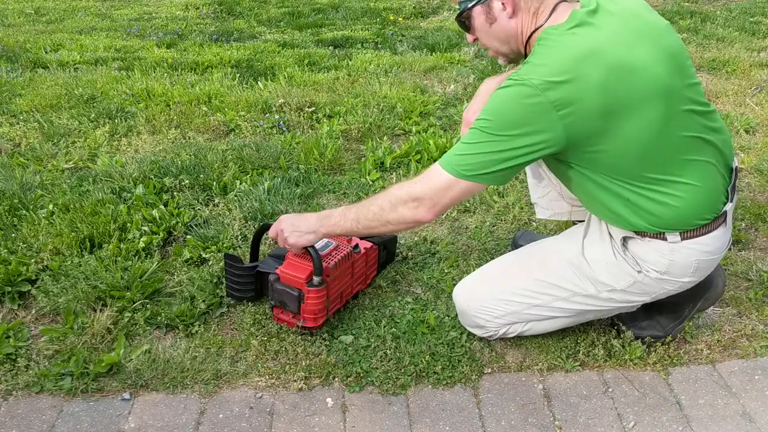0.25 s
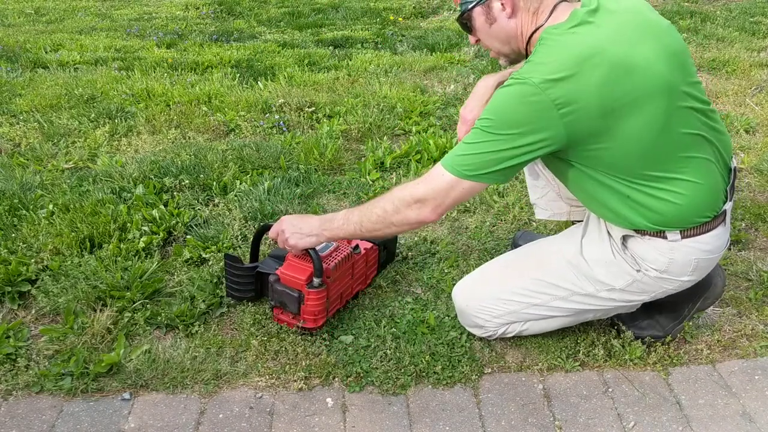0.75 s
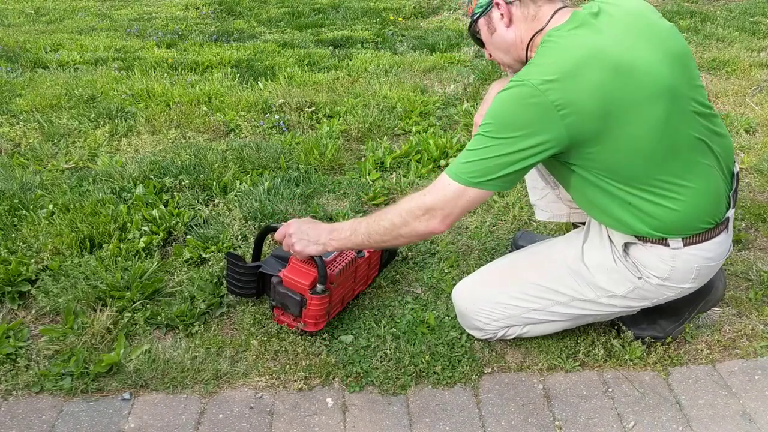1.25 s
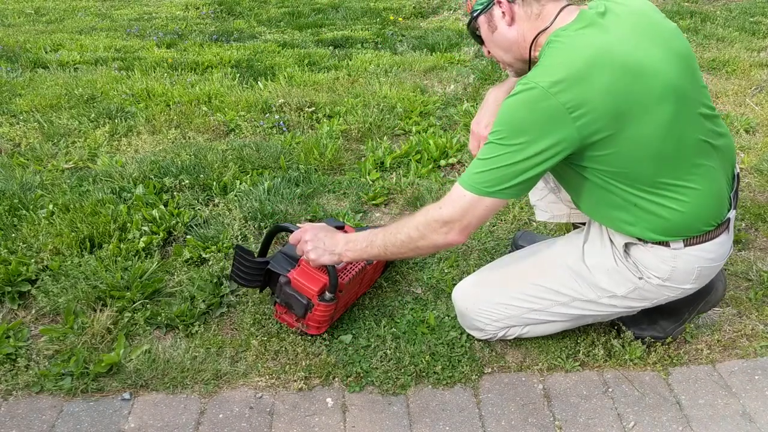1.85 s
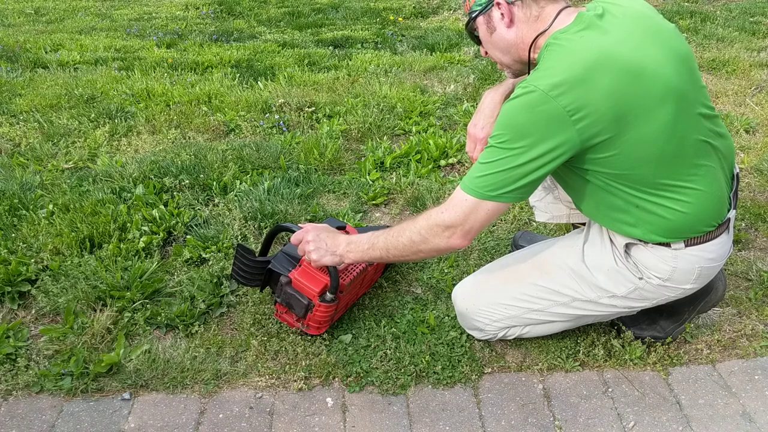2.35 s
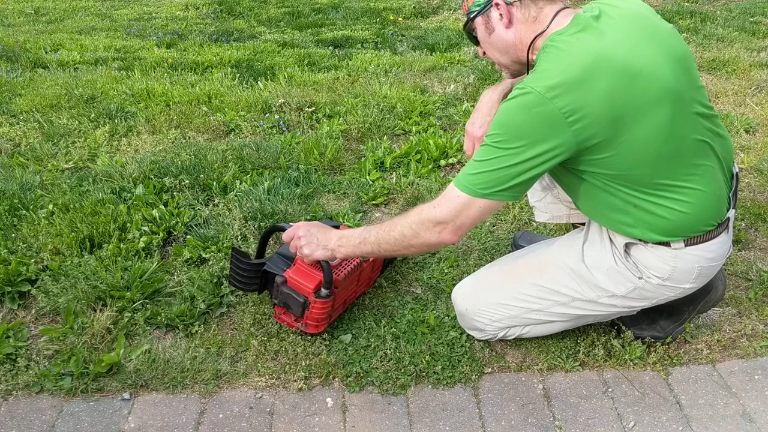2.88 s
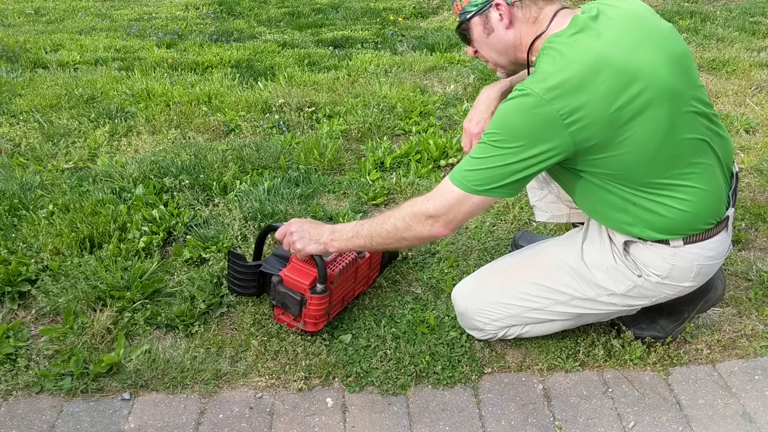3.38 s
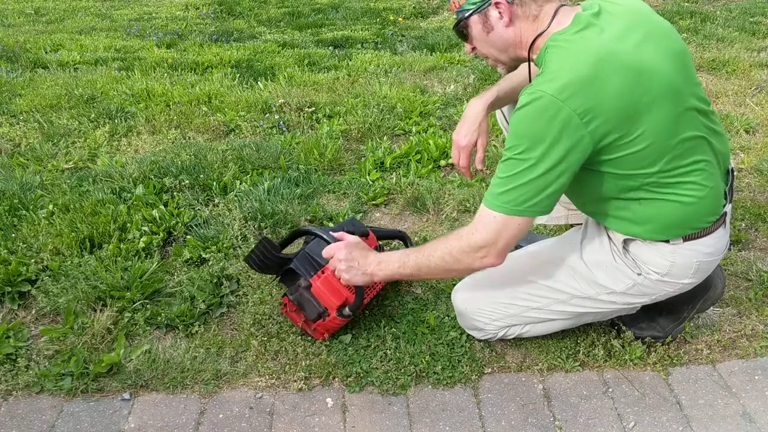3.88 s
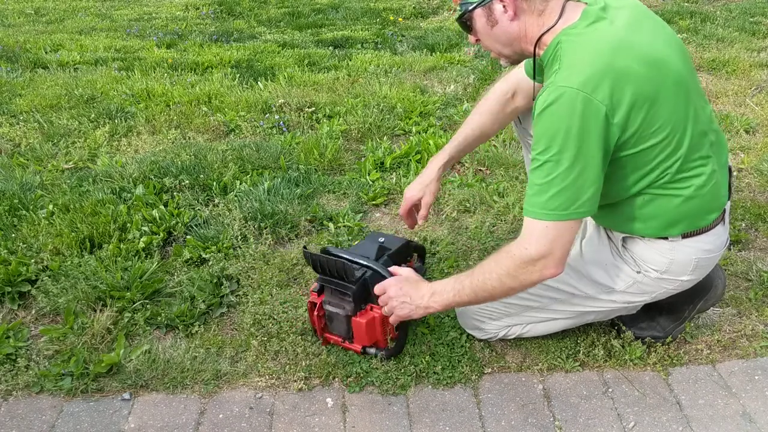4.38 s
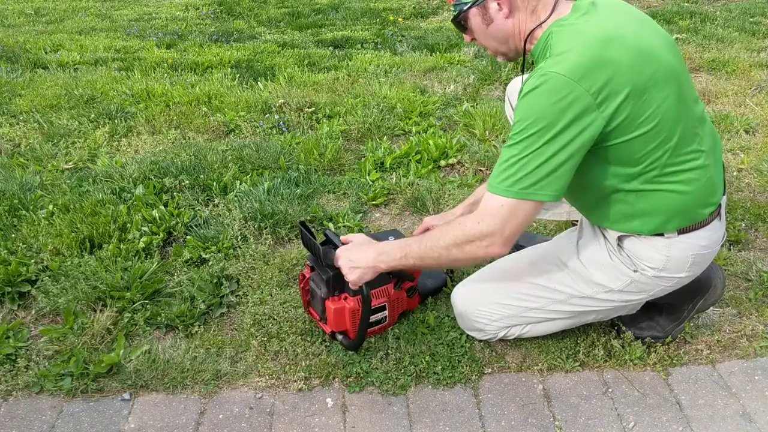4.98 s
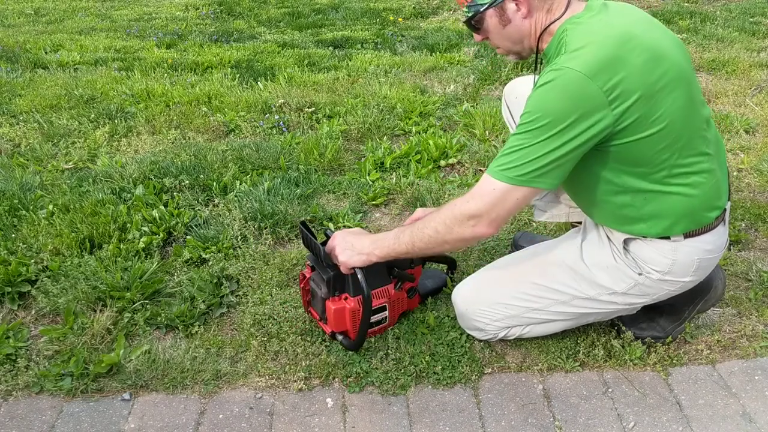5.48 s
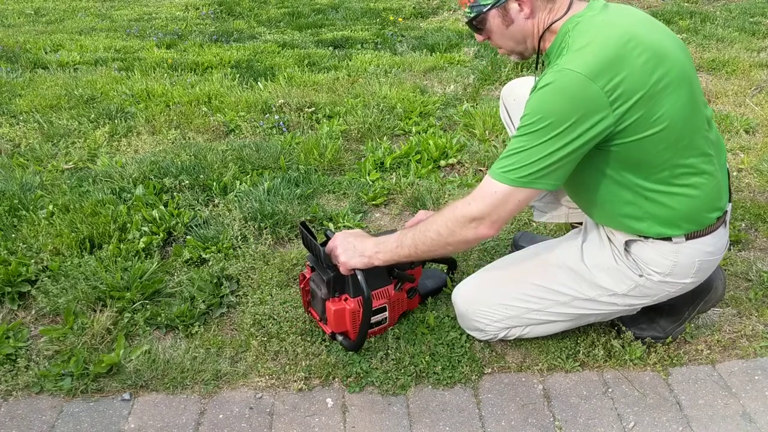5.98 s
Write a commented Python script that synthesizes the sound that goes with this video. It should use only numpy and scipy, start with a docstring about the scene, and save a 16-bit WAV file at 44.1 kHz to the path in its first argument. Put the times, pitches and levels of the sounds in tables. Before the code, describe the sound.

The first half is quiet open air: far traffic hum, a weak low motor tone, a thin insect whine, a songbird's repeated quick upslurs and short nasal crow caws, with scattered outdoor echoes. Near four seconds, grass brushes against a stopped saw being handled, followed by small hard plastic rattles. From about four and a half seconds, loud low wind buffeting bursts against the microphone until the end; the saw's engine never runs.

```python
"""A distant crow caws and small birds whistle over the hum of far traffic, a motor's drone and a thin insect whine.
Small birds then trill, lisp and chip: every bird note is a gliding tone, most with scattered echoes.
A man turns a stopped chainsaw over in the grass: grains of noise rustle, and short noise bursts click.
Then gusts of wind buffet the microphone: loud, low noise whose strength and colour follow the gusts."""
import sys
import numpy as np
from scipy import signal
from scipy.fft import rfft, irfft
from scipy.io import wavfile
from scipy.ndimage import uniform_filter1d

SR = 44100
rng = np.random.default_rng(int(sys.argv[2]) if len(sys.argv) > 2 else 0)


def put_to_file(sound):
    """Save the sound as 16-bit audio at rate SR, in the file named by the first command-line argument."""
    columns = np.atleast_2d(sound).T  # one column per channel
    safe = np.clip(columns, -1, 1)
    whole_steps = np.round(safe * 32767)
    wavfile.write(sys.argv[1], SR, whole_steps.astype(np.int16))


N = 275184
TIME = np.arange(N) / SR


def amp(db):
    """Turns decibels into a gain."""
    return 10 ** (np.asarray(db) / 20)


def unit(x):
    """Scales a sound to an average (rms) strength of 1."""
    return x / np.sqrt(np.mean(x ** 2) + 1e-20)


def noise():
    """Plain white noise, as long as the scene."""
    return rng.standard_normal(N)


def tone(hz):
    """A pure tone of rms 1 that follows a changing pitch."""
    phase = 2 * np.pi * np.cumsum(hz) / SR
    return np.sqrt(2) * np.sin(phase)


def curve(rows):
    """Joins the (time, level) points of a table by straight lines, giving a level at every sample."""
    times, levels = np.transpose(rows)
    return np.interp(TIME, times, levels)


def swells(rows):
    """Gain of bell-shaped swells that add in power; at the half-width the power is down to 1/e."""
    power = sum(amp(db) ** 2 * np.exp(-((TIME - peak_s) / half_s) ** 2) for peak_s, db, half_s in rows)
    return np.sqrt(power + 1e-14)


def colour(x, points):
    """Filters by a spectrum table that falls away steeply past its ends; rms 1."""
    hz, db = np.transpose(points)
    octave = np.log2(np.fft.rfftfreq(N, 1 / SR) + 1)
    known = np.log2(hz + 1)
    octaves_outside = abs(octave - np.clip(octave, known[0], known[-1]))
    gain = amp(np.interp(octave, known, db) - 9.6 * octaves_outside)
    return unit(irfft(rfft(x) * gain, N))


def drift(rate_hz, size=N):
    """Smooth random wander: noise kept below about rate_hz, scaled to rms 1 before it is cut to size."""
    f = np.fft.rfftfreq(N, 1 / SR)
    slow = irfft(rfft(noise()) / (1 + (f / rate_hz) ** 4), N)
    return unit(slow)[:size]


def add(mix, start_s, sound):
    """Mixes a sound in at a time, cutting off what runs past the end."""
    part = mix[max(round(start_s * SR), 0):][:len(sound)]
    part += sound[:len(part)]


def garden(x, t60):
    """Scatter from trees and house walls: sparse echoes that fade by 60 dB in t60 seconds, same energy."""
    t = TIME[:SR]
    echoes = rng.standard_normal(SR) * (rng.random(SR) < .1)
    build_up = 1 - np.exp(-t / 0.0055)
    tail = echoes * amp(-60 * t / t60) * build_up
    return signal.fftconvolve(x, tail / np.linalg.norm(tail))[:N]


def distant(x, wet_db, t60):
    """A sound together with its scatter."""
    return x + amp(wet_db) * garden(x, t60)


# Sound colour of far traffic and open air: (frequency [Hz], relative level [dB per Hz])
AIR_COLOUR = [(35, -21), (60, -1), (129, -5), (156, -4.5), (259, -9.5), (291, -11.5), (403, -12.5),
              (443, -15.5), (910, -11.5), (2100, -22), (3190, -27), (5450, -32), (7540, -34.5),
              (8670, -39.5), (15500, -39)]
# Tyre noise on a far road draws near and stays: (time [s], level [dB])
ROAD_LEVEL = [(0, -67.5), (1.9, -63.5), (2.5, -57), (6.24, -55.5)]


def background(air_db=-53, swell_db=0.78, throb_db=2.0):
    """Steady town hum and hiss with throbbing bass, plus tyre noise that draws near and stays."""
    air = amp(air_db) * colour(noise(), AIR_COLOUR)
    bass = signal.sosfilt(signal.butter(2, 300, fs=SR, output="sos"), air)
    throb = amp(throb_db * drift(4.6)) - 1
    # tyre colour: (frequency [Hz], relative level [dB per Hz])
    tyres = colour(noise(), [(200, 1.5), (350, -1), (600, -2.5), (950, -4.0), (1400, -6), (2200, -18)])
    road = amp(curve(ROAD_LEVEL) + swell_db * drift(4.7))
    return air + bass * throb + road * tyres


# Strength of the far motor, before its random fading: (time [s], level [dB])
DRONE_LEVEL = [(0, -60.5), (2.1, -59.5), (2.6, -67.5), (6.24, -64)]


def drone(hz=124, waver=0.026, fade_db=2):
    """A far motor: only its firing tone carries, wavering on the moving air."""
    firing = tone(hz * (1 + waver * drift(12.7)))
    return amp(curve(DRONE_LEVEL) + fade_db * drift(4.7)) * firing


# Spells of an insect's thin whine, before its flicker: (time of the peak [s], level [dB], half-width [s])
WHINE_SPELLS = [(.42, -76, 0.18), (1.25, -79, .22), (2.75, -79.5, .15), (4.9, -80.5, 0.95),
                (6.0, -78, 0.083)]


def insect(hz=7335, waver=0.0064, flicker_db=3):
    """A faint, narrow whine: one high, wavering tone that comes and goes."""
    whine = tone(hz * (1 + waver * drift(90)))
    return swells(WHINE_SPELLS) * amp(flicker_db * drift(25)) * whine


def notes(rows, waver, waver_hz, bow=0.98):
    """Bird notes: one gliding tone each, with a quick waver in pitch; a bow above 1 delays the glide."""
    out, shake = np.zeros(N), drift(waver_hz)
    for start_s, length_s, db, from_hz, to_hz in rows:
        share = np.arange(0, length_s, 1 / SR) / length_s
        glide = from_hz + (to_hz - from_hz) * share ** bow
        note_shake = shake[max(round(start_s * SR), 0):][:len(share)]
        note = tone(glide * (1 + waver * note_shake))
        add(out, start_s, amp(db) * note * signal.windows.tukey(len(share), .5))
    return out


# Clear whistles: (start [s], length [s], level [dB], from [Hz], to [Hz])
WHISTLE_NOTES = [(.26, .05, -73, 2700, 3150), (.305, 0.038, -66.5, 3100, 3850), (0, .08, -77, 4370, 4300),
                 (.19, .12, -78, 4370, 4370), (.5, .08, -77, 4370, 4370), (5.66, 0.09, -69.5, 2660, 3360),
                 (5.862, 0.1, -63.5, 4100, 4030)]


def whistles():
    """Clear whistled tones, some rising and some almost steady, with only a little scatter."""
    return distant(notes(WHISTLE_NOTES, waver=0.003, waver_hz=120), wet_db=-11, t60=.4)


# Thin, buzzy lisps: (start [s], length [s], level [dB], from [Hz], to [Hz])
LISP_NOTES = [(1.74, 0.075, -74.5, 7560, 7600), (2.72, 0.073, -77, 7400, 7350),
              (3.728, 0.037, -66.5, 8000, 7300), (3.745, .125, -71, 7240, 7120),
              (3.75, 0.112, -75, 7800, 7900), (5.783, 0.041, -68, 8160, 7480),
              (5.815, 0.065, -72, 7750, 7800)]


def lisps():
    """Thin, high lisps: a quick, random waver in pitch makes them buzz."""
    return distant(notes(LISP_NOTES, waver=0.015, waver_hz=350), wet_db=-0.5, t60=0.56)


def trill(count=14, low_hz=2850, high_hz=4000, slur_s=0.028, uneven_db=1.0):
    """A songbird's run of upslurs, slowing a little and, but for chance, loudest in the middle."""
    start_s, step_s, slowing_s = .74, .1265, .00015
    middle_db, ends_db = -65.5, -2.5  # ends_db is relative to the middle
    slurs = []
    for k in range(count):
        slur_start_s = start_s + step_s * k + slowing_s * k ** 2
        length_s = slur_s * rng.uniform(0.75, 1.2)
        from_middle = 2 * k / (count - 1) - 1
        db = middle_db + ends_db * from_middle ** 2 + uneven_db * rng.standard_normal()
        slurs.append((slur_start_s, length_s, db, low_hz, high_hz))
    return distant(notes(slurs, waver=0.016, waver_hz=200, bow=1.8), wet_db=-3.5, t60=0.56)


# Sharp rising chips, direct sound: (start [s], length [s], level [dB], from [Hz], to [Hz])
CHIP_NOTES = [(0.898, 0.0073, -64, 5980, 8500), (2.174, 0.008, -62, 5880, 8140),
              (2.826, 0.008, -61, 5200, 8250), (4.705, 0.0081, -48, 5600, 8370),
              (4.714, 0.0086, -56, 6570, 7700), (4.725, 0.0062, -57, 6400, 8200)]


def chips(scatter_db=-59):
    """Very short, fast-rising chips; the garden throws back about as much of a far one as of a near one."""
    direct = notes(CHIP_NOTES, waver=.004, waver_hz=500)
    thrown = [(start_s, length_s, scatter_db, from_hz, to_hz)
              for start_s, length_s, _, from_hz, to_hz in CHIP_NOTES]
    return direct + garden(notes(thrown, waver=0.0091, waver_hz=500), t60=0.6)


# Caws: (start [s], length [s], level before shaping [dB], top pitch before flutter [Hz])
CAW_CALLS = [(0.039, 0.099, -55, 718), (2.236, 0.093, -54.5, 711), (2.761, .1, -49.5, 713),
             (3.716, 0.12, -48, 729), (4.36, 0.11, -47.5, 725), (4.891, .103, -47, 711.4),
             (5.837, 0.084, -48, 699)]
# Course of one caw: (share of its length [0 to 1], pitch factor [ratio], relative level [dB])
CAW_COURSE = [(0, .86, -8), (.15, .945, -1.5), (.32, 1., 0), (.55, .96, -.5), (.8, .9, -3.5), (1, .845, -8)]
# Relative strength of partials 1 to 4 of the voice: one level each [dB]
CAW_PARTIAL_LEVELS = [-19, -1, -17.5, -31]


def crow(rasp=0.27, rasp_hz=62):
    """Arched nasal caws, fluttering in pitch and strength; the throat favours the second partial."""
    out = np.zeros(N)
    course_share, course_pitch, course_db = np.transpose(CAW_COURSE)
    for start_s, length_s, db, top_hz in CAW_CALLS:
        t = np.arange(0, length_s, 1 / SR)
        share = t / length_s
        flutter = np.sin(2 * np.pi * (rasp_hz * t + rng.random()))
        shake = 1 + .017 * flutter + .02 * drift(200, size=len(t))
        hz = top_hz * np.interp(share, course_share, course_pitch) * shake
        phase = 2 * np.pi * np.cumsum(hz) / SR
        voice = sum(amp(part_db) * np.sin(k * phase) for k, part_db in enumerate(CAW_PARTIAL_LEVELS, 1))
        swell = amp(db + np.interp(share, course_share, course_db)) * signal.windows.tukey(len(t), .15)
        add(out, start_s, unit(voice) * (1 + rasp * flutter) * swell)
    return distant(out, wet_db=-5.5, t60=0.64)


def notes_after_caws(gap_s=.012, length_s=0.09, relative_db=-12.5, from_hz=1750, to_hz=1410):
    """A fainter falling note that follows every caw."""
    falling = [(start_s + caw_s + gap_s, length_s, db + relative_db, from_hz, to_hz)
               for start_s, caw_s, db, _ in CAW_CALLS]
    return distant(notes(falling, waver=.035, waver_hz=180), wet_db=-4.5, t60=0.72)


# Movements of the saw that stir grass and cloth: (time of the peak [s], level [dB], half-width [s])
RUSTLE_MOVES = [(.21, -65, .06), (4.0, -64.5, .35), (4.43, -60, .13), (5.0, -60, 0.34), (5.95, -63, 0.61)]
# Sound colour of the rustle: (frequency [Hz], relative level [dB per Hz])
RUSTLE_SPECTRUM = [(250, 1.5), (400, 12.5), (800, -2.5), (2000, -0.5), (4000, -3), (7000, -7), (10000, -14),
                   (15500, -16)]


def rustle(grains_per_s=9000, patchy_db=1.3):
    """Grass blades brush the saw in a dense, patchy stream of tiny random grains."""
    grains = noise() * (rng.random(N) < grains_per_s / SR)
    return swells(RUSTLE_MOVES) * amp(patchy_db * drift(12)) * colour(grains, RUSTLE_SPECTRUM)


# Clicks and rattles of the saw's plastic parts: (time [s], peak level [dB], centre [Hz], decay [s])
PLASTIC_KNOCKS = [(4.29, -47, 6100, 0.016), (4.352, -58, 9000, .004), (4.921, -47, 4000, 0.0023),
                  (4.961, -53, 4000, 0.0042), (4.9775, -54, 8000, .006), (4.9828, -40.5, 2390, 0.0042),
                  (4.9995, -50, 8000, .0015), (5.0103, -52.5, 3720, .005), (5.0145, -50, 5800, 0.0043)]


def plastic_clicks(width_octaves=0.53):
    """Plastic parts rattle in short, dead bursts: fading noise passed through a band around one pitch."""
    out, t = np.zeros(N), TIME[:SR // 16]
    for start_s, peak_db, centre_hz, decay_s in PLASTIC_KNOCKS:
        edges_hz = centre_hz * 2 ** (np.array([-.5, .5]) * width_octaves)
        band = signal.butter(2, edges_hz, "bandpass", fs=SR, output="sos")
        burst = rng.standard_normal(len(t)) * np.exp(-t / decay_s)
        knock = signal.sosfilt(band, burst)
        add(out, start_s, amp(peak_db) * knock / abs(knock).max())
    return out


# Mean strength of a breeze that freshens, before its lumps: (time [s], level [dB])
BREEZE_LEVEL = [(0, -68), (1.1, -57.5), (2.1, -56), (3.68, -56), (3.93, -47.5), (4.54, -49), (4.66, -32.5),
                (5.2, -38), (5.7, -31.5), (6.04, -33.5), (6.1, -44.5)]
# Gusts on top of the breeze: (time of the peak [s], level [dB], half-width [s])
GUST_SWELLS = [(2.41, -46.5, 0.016), (3.84, -39, 0.06), (4.68, -27, .026), (4.745, -24.5, 0.017),
               (4.84, -27, .014), (4.9, -21.5, 0.03), (5.005, -25, 0.017), (5.075, -33.5, 0.014),
               (5.135, -33, 0.0082), (5.275, -31, 0.015), (5.33, -28, 0.0093), (5.425, -25, .018),
               (5.468, -25, 0.0096), (5.575, -29, 0.062), (5.82, -22.5, 0.018), (5.88, -24, 0.028),
               (5.975, -29, 0.026), (6.16, -24.5, 0.015), (6.222, -25.5, 0.026)]
# Turbulence at the microphone in a light gust: (frequency [Hz], relative level [dB per Hz])
LIGHT_WIND_COLOUR = [(13, -47), (22, -19), (54, 3.5), (108, 2.5), (160, -4.5), (184, -8.5), (450, -31.5),
                     (580, -46), (990, -120)]
# The same in a hard gust: (frequency [Hz], relative level [dB per Hz])
HARD_WIND_COLOUR = [(13, -43), (22, -34), (59, 4), (102, 3.5), (285, -12.5), (371, -25), (454, -24.5),
                    (713, -38.5), (900, -41), (1170, -71), (1980, -120)]


def wind(light_db=-32.0, hard_db=-24, steadiness=0.75, lumpy_db=1.9, lumpy_hz=16):
    """Turbulence at the microphone: the harder the gust, the smaller the eddies and the higher the rumble."""
    eddies_per_s, eddy_half_s, eddy_db = 21, .0017, 6  # rate and peak over the wind's level, at full hardness
    breeze = amp(curve(BREEZE_LEVEL) + lumpy_db * drift(lumpy_hz))
    strength = np.hypot(breeze, swells(GUST_SWELLS))
    # hardness: 0 at light_db and below, 1 at hard_db and above
    hard = np.clip((20 * np.log10(strength) - light_db) / (hard_db - light_db), 0, 1)
    flow = noise()
    rumble = (1 - hard) * colour(flow, LIGHT_WIND_COLOUR) + hard * colour(flow, HARD_WIND_COLOUR)
    # the gust, more than chance, sets the strength from moment to moment
    power = uniform_filter1d(uniform_filter1d(rumble ** 2, size=1500), size=1000)
    steadied = rumble / (abs(power) + 1e-6) ** (steadiness / 2)
    # sharp eddies: a peak with a dip on either side, at random moments of hard wind
    hits = hard * (rng.random(N) < eddies_per_s / SR)
    u = np.arange(-4, 4, 1 / (SR * eddy_half_s))
    eddies = signal.fftconvolve(hits, (1 - 2 * u ** 2) * np.exp(-u ** 2), "same")
    return strength * (steadied + amp(eddy_db) * eddies)


def scene():
    """Everything at one microphone."""
    far = background() + drone() + insect()
    birds = whistles() + lisps() + trill() + chips() + crow() + notes_after_caws()
    saw = rustle() + plastic_clicks()
    return (far + birds + saw + wind())[None]


def record(dry, low_cut_hz=39, edge_hz=15800):
    """The recorder's low cut and upper band limit, with 3 ms fades at both ends."""
    f = np.fft.rfftfreq(2 * N, 1 / SR) + 1
    low_cut = 1 / np.sqrt(1 + (low_cut_hz / f) ** 8)
    dry = irfft(rfft(dry, 2 * N) * low_cut)[:, :N]
    dry = dry * np.minimum(np.minimum(TIME, TIME[::-1]) / .003, 1)
    band_limit = signal.firwin(511, edge_hz, window=("kaiser", 9), fs=SR)
    return signal.oaconvolve(dry, band_limit[None], "same")


dry = scene()
out = record(dry)
put_to_file(out)
```